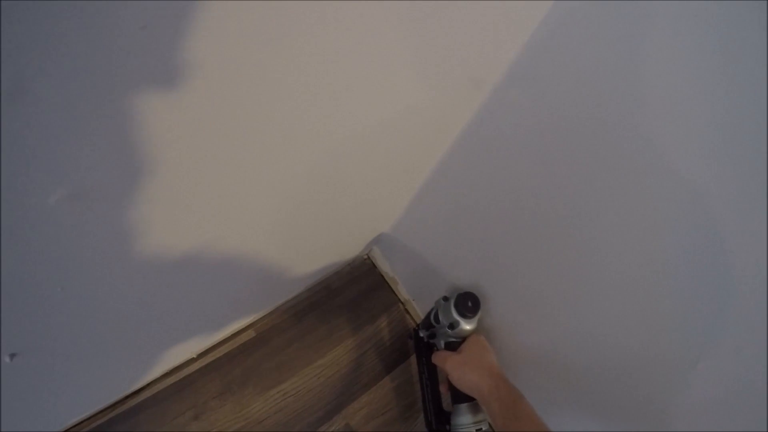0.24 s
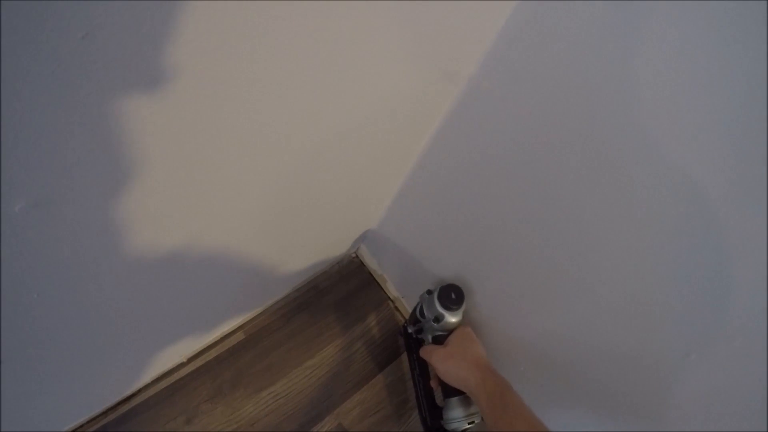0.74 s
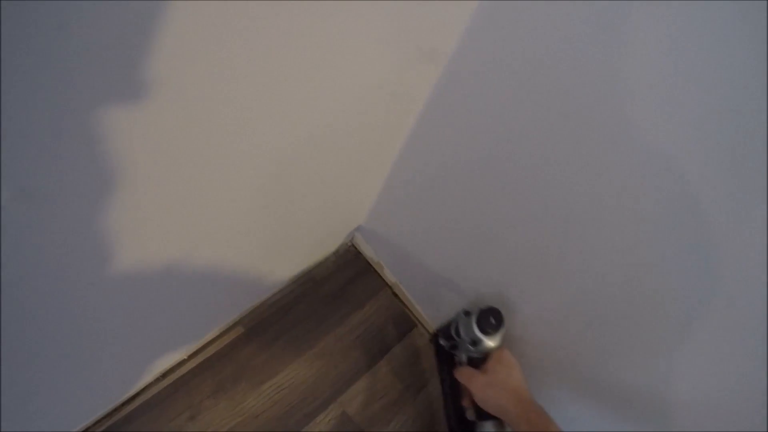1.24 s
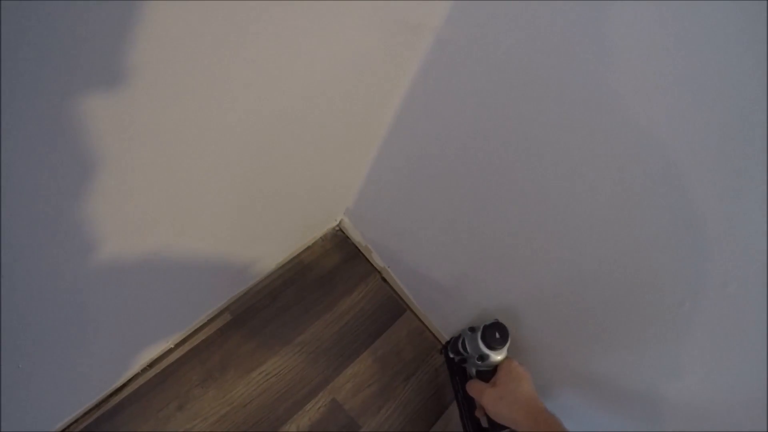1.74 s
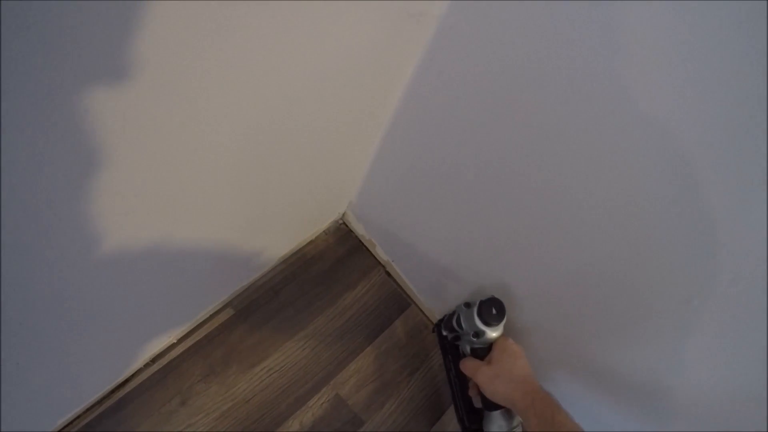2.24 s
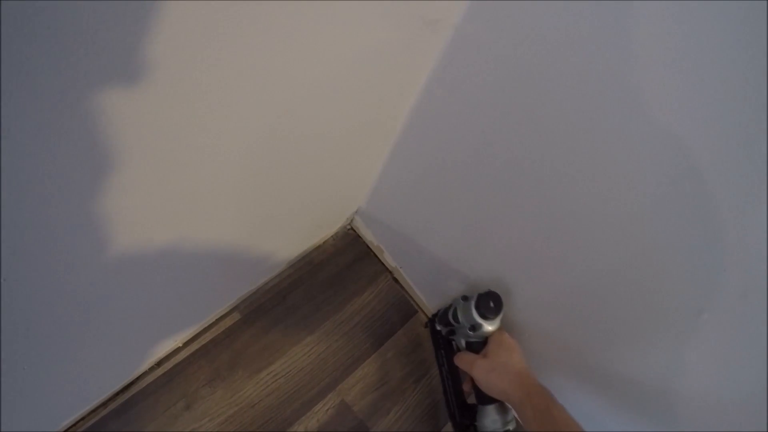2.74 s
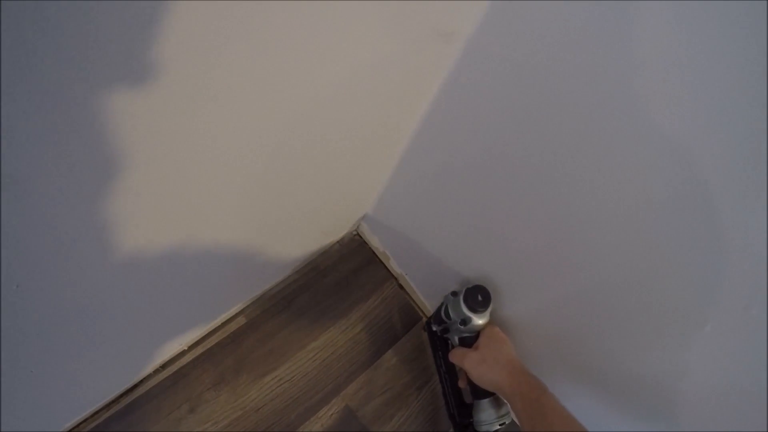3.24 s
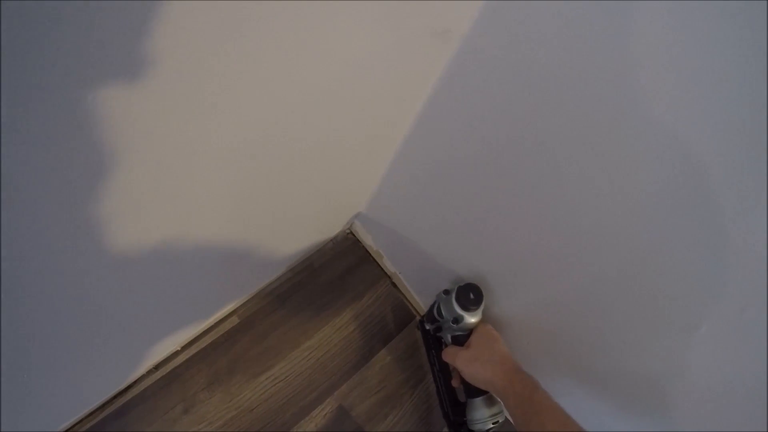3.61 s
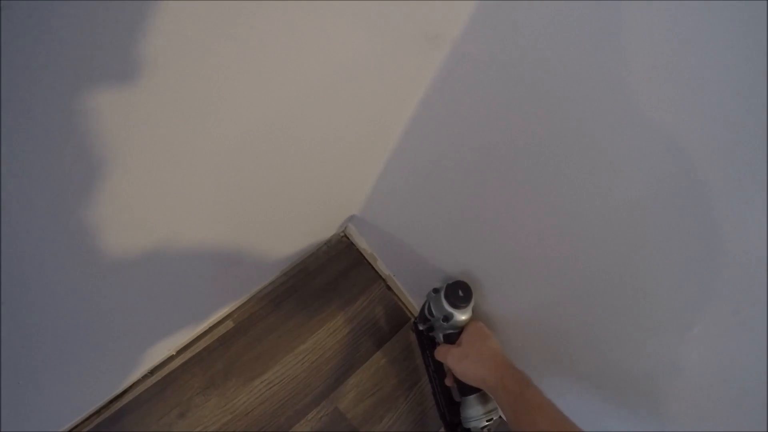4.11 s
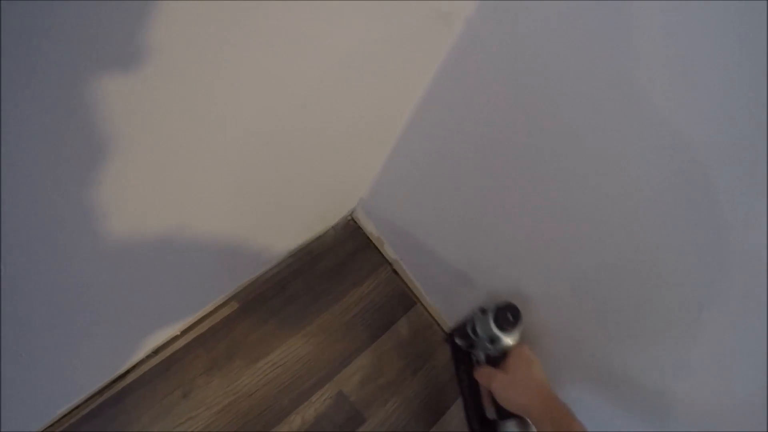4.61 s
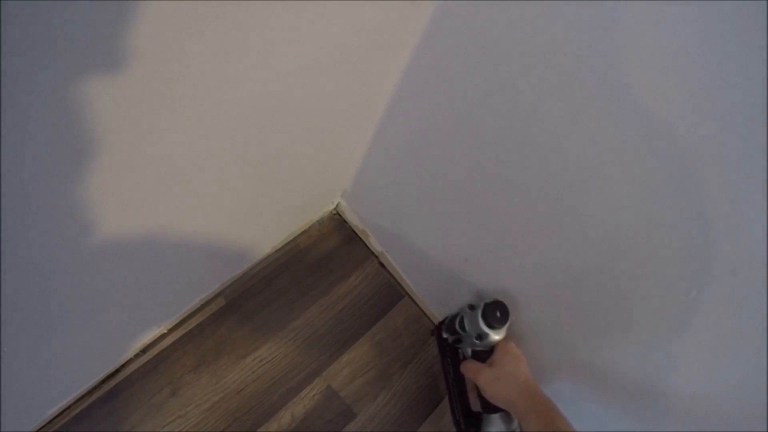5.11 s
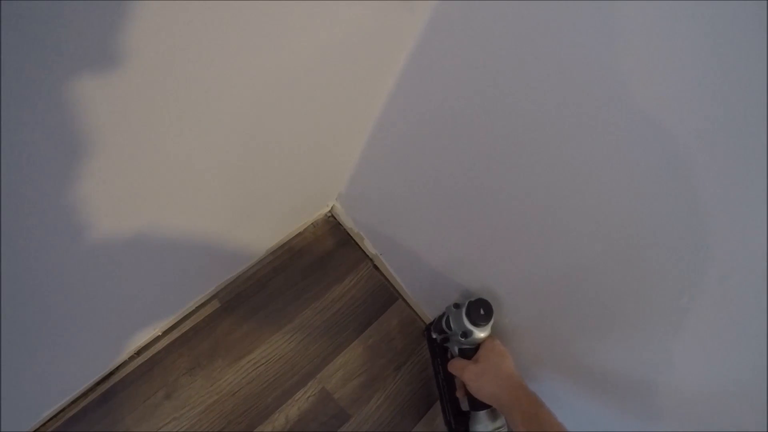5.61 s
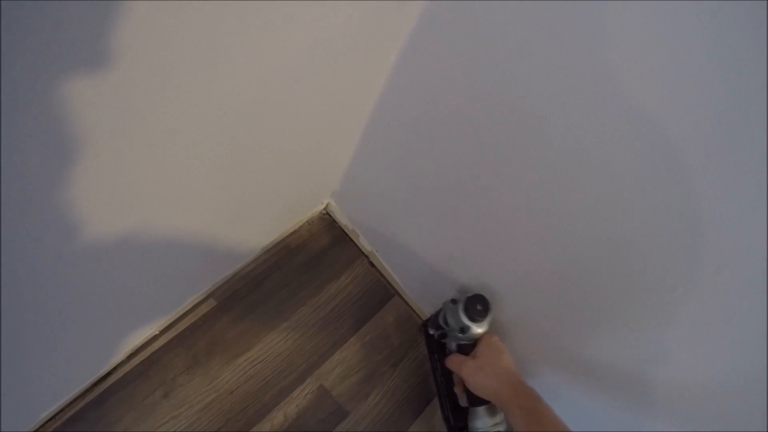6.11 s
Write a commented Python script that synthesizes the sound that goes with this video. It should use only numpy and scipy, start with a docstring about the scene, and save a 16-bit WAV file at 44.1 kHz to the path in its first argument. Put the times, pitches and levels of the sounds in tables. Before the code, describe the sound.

Two sharp, thumping nail gun shots, each followed by a puff of air, with faint tool handling on a wooden floor in between.

```python
"""Two loud nailer shots, each a thump of air and a sharp crack, on a wooden floor in a bare room.
Air slams the piston down and the driver hits the nail; on trigger release the cylinder vents
and the piston knocks back. Between shots the tool is shifted and set down: clacks, scrapes,
squeaks and soft thuds on the boards. The shots overload the close microphone."""
import sys
import numpy as np
from scipy import signal
from scipy.fft import rfft, irfft
from scipy.io import wavfile
from scipy.ndimage import minimum_filter1d

SR = 44100
rng = np.random.default_rng(int(sys.argv[2]) if len(sys.argv) > 2 else 0)


def generate_wav(sig):
    """Save sig (samples, or channels by samples) to the path in sys.argv[1] as 16-bit PCM at SR."""
    pcm = np.round(np.clip(np.atleast_2d(sig).T, -1, 1) * 32767).astype(np.int16)
    wavfile.write(sys.argv[1], SR, pcm)


N = 280035
TIME = np.arange(N) / SR

# Each row: start in seconds, air push peak in dB, crack level in dB, its rise and its T60 in seconds.
NAIL_SHOTS = [(0.7492, 16.5, 9, .001, 0.052), (5.9427, 12, 9, 0.0045, 0.038)]
# Driver and piston spectra. Each row: frequency in Hz, relative level in dB.
CRACK_COLOUR = [(50, 10.5), (130, 7), (280, -2), (430, -5.5), (900, 3), (1400, 2.5), (1850, -2),
                (3000, -8.5), (5000, -6), (6000, -11.5), (7300, -17), (15000, -27)]
PISTON_COLOUR = [(80, -7), (400, -6), (1000, 4.5), (1500, -10), (2000, -3.5), (2900, -7), (5000, -21.5),
                 (15000, -36.5)]

def shots(push_s=0.0012, strike_s=0.0059, bang_s=0.008, recoil_s=0.017):
    """The valve snaps open, air slams the piston down, the driver hits the nail, the floor rebounds."""
    valve, push, crack, bang = np.zeros((4, N))
    for start_s, push_db, crack_db, rise_s, t60_s in NAIL_SHOTS:
        strike = burst(crack_db, t60_s, rise_s)
        add(valve, start_s, burst(level_db=2, t60_s=0.086))
        add(push, start_s + push_s, pulse(push_db, low_hz=63.4, high_hz=270))
        add(push, start_s + recoil_s, pulse(peak_db=3, low_hz=80, high_hz=225))
        add(crack, start_s + strike_s, strike)
        # The crack's whole energy meets the walls as one impulse.
        add(bang, start_s + bang_s, np.linalg.norm(strike, keepdims=True))
    valve = coloured(valve, PISTON_COLOUR)
    boom = body(push, ring_gain=0.25)
    direct = body(valve + coloured(crack, CRACK_COLOUR)) + boom
    blast = from_db(-10) * coloured(bang, CRACK_COLOUR) + from_db(-11.5) * valve
    to_walls = body(blast, ring_gain=0.72) + from_db(-14) * boom
    return direct, to_walls


# Each row: start in seconds, puff peak in dB, hiss in dB, hiss T60 in seconds, piston knock in dB.
EXHAUSTS = [(0.9063, 8, -1, 0.1, -1.5), (6.0739, 7.5, -2, 0.1, -3)]
# Each row: frequency in Hz, relative level in dB.
HISS_COLOUR = [(200, 3.5), (500, 1.5), (1000, -2), (1700, -9.5), (2600, -1), (3700, -6), (5100, 3),
               (6300, -0.5), (7600, -6), (10000, -7), (13500, -2), (16000, -19.5)]

def vents(trigger_lead_s=0.0035, valve_stop_s=0.016, return_s=0.028):
    """The trigger clicks, spent air puffs and hisses out, and the piston knocks home."""
    puff, hiss, knock = np.zeros((3, N))
    for start_s, puff_db, hiss_db, hiss_t60_s, knock_db in EXHAUSTS:
        add(hiss, start_s, burst(hiss_db, hiss_t60_s, rise_s=0.0033))
        add(puff, start_s, pulse(puff_db, low_hz=44.5, high_hz=143, order=3))
        add(puff, start_s + valve_stop_s, pulse(peak_db=2, low_hz=111, high_hz=428))
        add(knock, start_s - trigger_lead_s, burst(level_db=-12, t60_s=0.066))
        add(knock, start_s + return_s, burst(knock_db, t60_s=0.024))
    exhaust = coloured(hiss, HISS_COLOUR) + body(coloured(knock, PISTON_COLOUR))
    return exhaust + puff, from_db(-13) * exhaust + from_db(-11) * puff


# Each row: start in seconds, base level in dB, clink offset in dB.
TOOL_CLACKS = [(1.254, -26.5, -16.5), (2.145, -48, -21), (2.908, -29, -17.5), (3.03, -32.5, -16),
               (3.038, -25.5, -19), (3.072, -27, -22.5), (3.225, -16.5, -15), (3.242, -34, -1.5),
               (3.27, -26, -11), (4.443, -32, -4), (4.521, -21, -9.5), (4.766, -26.5, 3), (5.057, -38, -26),
               (5.168, -28, -24), (5.178, -27.5, -13), (5.222, -27.5, -18.5), (5.345, -30.5, -7),
               (5.37, -37.5, -6.5), (5.399, -40.5, 3), (5.469, -16.5, -13), (5.691, -34.5, -22)]
# Wood and metal spectra. Each row: frequency in Hz, relative level in dB.
KNOCK_COLOUR = [(80, -10), (330, 3.5), (600, -0.5), (1150, 3), (1500, -7.5), (1850, -17), (2800, -19.5),
                (5000, -24), (15000, -58)]
CLINK_COLOUR = [(400, -10.5), (1800, -7.5), (2700, 4), (3700, -10.5), (5200, -1.5), (6800, -8),
                (8800, -16.5), (13000, -19.5), (16000, -21)]

def clacks(knock_offset_db=-4, rise_s=0.0007):
    """The tool hits floor and trim: a wooden knock and a metal clink."""
    knock, clink = np.zeros((2, N))
    for start_s, base_db, clink_offset_db in TOOL_CLACKS:
        add(knock, start_s, burst(base_db + knock_offset_db, t60_s=0.059, rise_s=rise_s))
        add(clink, start_s, burst(base_db + clink_offset_db, t60_s=0.046, rise_s=rise_s))
    return coloured(knock, KNOCK_COLOUR), coloured(clink, CLINK_COLOUR)


# Each row: start in seconds, level in dB.
TIP_TICKS = [(0.054, -46.5), (0.713, -41.5), (4.113, -42), (5.279, -36.5), (5.887, -37)]
# Each row: frequency in Hz, relative level in dB.
TICK_COLOUR = [(500, -16), (3800, -15), (4700, -1), (5300, 0), (5900, -19), (6600, -14), (7500, -27),
               (15000, -27)]

def ticks():
    """The sprung safety tip ticks."""
    track = np.zeros(N)
    for start_s, level_db in TIP_TICKS:
        add(track, start_s, burst(level_db, t60_s=0.03077))
    return coloured(track, TICK_COLOUR)


# Each row: midpoint in seconds, length in seconds, hard scrape in dB, soft shuffle in dB.
SLIDE_STROKES = [(0.009, 0.16, -61, -41), (0.393, 0.37, -73, -50.5), (3.228, 0.078, -46.5, -25),
                 (3.755, 0.14, -62, -35), (4.438, 0.13, -59.5, -41), (4.52, 0.066, -41.5, -44),
                 (5.397, 0.28, -50, -39)]
# Each row: frequency in Hz, relative level in dB.
SCRAPE_COLOUR = [(200, -9), (600, 0.5), (1080, 1), (1800, -7.5), (2800, -7.5), (3700, -16), (5300, -10.5),
                 (8500, -35), (15000, -33.5)]
SHUFFLE_COLOUR = [(40, 8.5), (110, 4), (260, 0), (500, -14.5), (1500, -41.5), (8000, -52.5)]

def scrapes(grit_db=4):
    """The sliding nose catches on the grain, so its scrape flickers."""
    envelope = sum(from_db(db) * swell(mid_s, length_s) for mid_s, length_s, db, _ in SLIDE_STROKES)
    catch_times_s = TIME[::150]
    catches = np.interp(TIME, catch_times_s, rng.standard_normal(len(catch_times_s)))
    return coloured(envelope * from_db(grit_db * catches) * rng.standard_normal(N), SCRAPE_COLOUR)


def shuffles():
    """Soft weight rubs over the boards with each slide."""
    envelope = sum(from_db(db) * swell(mid_s, length_s) for mid_s, length_s, _, db in SLIDE_STROKES)
    return coloured(envelope * rng.standard_normal(N), SHUFFLE_COLOUR)


# Each row: start in seconds, time until release in seconds, initial slip rate in Hz, level in dB.
NOSE_SQUEAKS = [(4.49, .015, 1220, -34), (4.514, 0.015, 1060, -40), (4.53, 0.02, 350, -29)]
# Each row: frequency in Hz, relative level in dB.
SLIP_COLOUR = [(300, -7), (700, -10), (1120, 6.5), (1700, -4.5), (2100, -9.5), (2850, 3.5), (3800, -16.5),
               (5000, -5), (6200, -12), (9000, -41), (15000, -45)]

def squeaks(jitter=0.31, sag_oct_per_s=5, rise_s=0.0034, t60_s=0.039):
    """The nose sticks and slips along the trim; friction brakes it, so the slips slow down."""
    track, t = np.zeros(N), TIME[:6000]
    for start_s, release_s, initial_hz, level_db in NOSE_SQUEAKS:
        rate_hz = initial_hz * 2 ** (-sag_oct_per_s * t)
        unevenness = np.maximum(1 + jitter * rng.standard_normal(len(t)), 0)
        slip_count = np.floor(np.cumsum(rate_hz * unevenness) / SR)
        slips = np.diff(slip_count, prepend=0) - rate_hz / SR  # zero-mean impulse train
        envelope = np.minimum(t / rise_s, 1) * from_db(level_db - 60 * np.maximum(t - release_s, 0) / t60_s)
        add(track, start_s, slips * np.sqrt(SR / rate_hz) * envelope)
    return coloured(track, SLIP_COLOUR)


# Nose and magazine. Each row: frequency in Hz, bandwidth in Hz, relative gain in dB.
STEEL_MODES = [(2750, 110, -12.5), (4670, 61, 6), (5060, 31, -18)]

def handling(steel_gain=0.825, wet_db=-10):
    """Light contacts ring the body gently; the clinks also ring the steel parts."""
    knock, clink = clacks()
    contact = knock + clink + ticks() + scrapes() + squeaks()
    direct = body(contact, ring_gain=0.31) + steel_gain * ringing(clink, STEEL_MODES)
    return direct, from_db(wet_db) * direct


# Each row: start in seconds, peak in dB, upper band edge in Hz (higher for a firmer landing).
LANDINGS = [(1.141, -21, 239), (2.912, -25, 410), (3.083, -19.5, 193), (3.1696, -14.5, 218),
            (3.22, -16.5, 216), (3.2871, -13, 239.8), (4.46, -23.5, 108), (4.766, -0.5, 238),
            (5.0585, -11, 188.5), (5.307, -18, 174), (5.4167, -5, 196), (5.462, -14.5, 159.4),
            (5.5089, -15.5, 190.4), (6.257, -21, 258)]
# Duller returns through the floor. Each row: delay in seconds, gain in dB, upper edge ratio.
BOARD_ECHOES = [(0.01, -8.5, 0.76), (0.036, -17.5, 0.626), (.049, -17, .65)]

def thuds(low_hz=52, sway_s=0.0079, sway_db=-20, hum_hz=305, hum_db=-25, wet_db=-14):
    """Soft weight bumps and shuffles on the boards, which sway and hum on briefly."""
    bumps, hum = np.zeros((2, N))
    for start_s, peak_db, edge_hz in LANDINGS:
        add(bumps, start_s, -pulse(peak_db, low_hz, edge_hz, order=3))
        add(bumps, start_s + sway_s, -pulse(peak_db + sway_db, low_hz=32.3, high_hz=67.5))
        add(hum, start_s, burst(peak_db + hum_db, t60_s=0.34))
        for delay_s, echo_db, ratio in BOARD_ECHOES:
            add(bumps, start_s + delay_s, -pulse(peak_db + echo_db, low_hz, edge_hz * ratio, order=3))
    hum_colour = [(hum_hz / 2, -14), (hum_hz, 0), (hum_hz * 2, -22), (4000, -65)]
    direct = bumps + coloured(hum, hum_colour) + shuffles()
    return direct, from_db(wet_db) * direct


# Nailer and boards. Each row: frequency in Hz, bandwidth in Hz, relative gain in dB.
BODY_MODES = [(96, 12, 2), (184, 17, 8), (294, 38, 12.5), (683.6, 100, -8), (787, 18, -11.5), (896, 35, -5),
              (993, 24, -4), (1150, 35, 1.5), (1246, 18, 4.5), (1378, 79, -1), (1585, 17, 1),
              (1970, 13, -2.5), (2304, 17, 2.5), (2744, 22, 3.5), (2860, 14, 0), (2840, 17, 4),
              (3420, 12, 1), (3810, 53, -3.5), (4480, 49, 0.5), (4500, 790, -5), (5500, 70, -4.5)]

def body(blow, ring_gain=0.97):
    """A blow plus the ringing it excites in the tool and the boards."""
    return blow + ring_gain * ringing(blow, BODY_MODES)


# Each row: frequency in Hz, T60 in seconds.
REVERB_T60_S = [(60, 0.45), (300, 0.69), (1000, 0.78), (3000, 0.75), (5200, 0.6762), (8000, 0.4),
                (14000, 0.48)]
# Each row: frequency in Hz, relative level in dB.
REVERB_COLOUR = [(50, -1.5), (110, 1.5), (250, -3.5), (450, 1.1), (1200, -4), (4000, 3.5), (8000, 1.5),
                 (14000, 4.5)]

def room(x, first_echo_s=0.0016, build_s=0.008, bands=16):
    """Dense echoes off bare walls; the midrange lasts longest."""
    t, tail = TIME[:SR], np.zeros(SR)
    white, hz = rfft(rng.standard_normal(SR)), np.fft.rfftfreq(SR, 1 / SR)
    centres_hz = np.geomspace(60, 15000, bands)
    for centre_hz, weights in zip(centres_hz, np.eye(bands)):
        band = irfft(white * at_hz(np.c_[centres_hz, weights], hz), SR)
        decay_db = 60 * t / at_hz(REVERB_T60_S, centre_hz)
        tail += band * from_db(at_hz(REVERB_COLOUR, centre_hz) - decay_db)
    tail *= np.clip((t - first_echo_s) / build_s, 0, 1)
    return signal.fftconvolve(x, tail / np.linalg.norm(tail))[:N]


# Each row: time in seconds, level in dB.
RUMBLE_LEVELS = [(0, -51.5), (1.3, -47), (1.6, -55.5), (2.5, -49.5), (4.05, -52), (4.7, -39.5),
                 (6.35, -38.5)]
# Each row: frequency in Hz, relative level in dB.
MOVEMENT_COLOUR = [(15, -7), (35, 1), (60, -4), (110, -12.5), (250, -22), (700, -38), (3000, -69)]
AIR_COLOUR = [(12, -31.5), (20, -5), (44, 1.5), (116, -13.5), (180, -25.5), (245, -27), (289, -35),
              (534, -25), (614, -30), (686, -35.5), (1270, -35.5), (1450, -38), (2090, -40.5), (5850, -43),
              (15500, -56)]

def background(air_db=-47):
    """Rumble of movement at the microphone, over still room air and microphone hiss."""
    rumble_db = np.interp(TIME, *np.transpose(RUMBLE_LEVELS))
    rumble = from_db(rumble_db) * coloured(rng.standard_normal(N), MOVEMENT_COLOUR)
    return rumble + from_db(air_db) * coloured(rng.standard_normal(N), AIR_COLOUR)


def from_db(db):
    """Decibels to gain."""
    return 10 ** (np.asarray(db) / 20)


def at_hz(table, hz):
    """Read a table on a log-frequency axis."""
    table_hz, values = np.transpose(table)
    return np.interp(np.log(np.maximum(hz, 1)), np.log(table_hz), values)


def add(track, start_s, sound):
    """Mix a sound into a track."""
    i = int(round(start_s * SR))
    track[i:i + len(sound)] += sound[:N - i]


def coloured(x, colour, size=4096):
    """Minimum-phase filter that keeps the power of white noise."""
    gain = from_db(at_hz(colour, np.fft.rfftfreq(size, 1 / SR)))
    cepstrum = irfft(np.log(gain))
    cepstrum[1:size // 2] *= 2
    cepstrum[size // 2 + 1:] = 0
    response = irfft(np.exp(rfft(cepstrum)))
    return signal.fftconvolve(x, response / np.linalg.norm(response))[:N]


def burst(level_db, t60_s, rise_s=0.001):
    """A rush of tiny contacts or eddies that builds quickly and dies away."""
    t = TIME[:12000]
    envelope = np.minimum(t / rise_s, 1) * from_db(level_db - 60 * np.maximum(t - rise_s, 0) / t60_s)
    return rng.standard_normal(len(t)) * envelope


def pulse(peak_db, low_hz, high_hz, order=2):
    """One pressure pulse that swings back and settles."""
    bandpass = signal.butter(order, [low_hz, high_hz], "band", fs=SR, output="sos")
    wave = signal.sosfilt(bandpass, signal.unit_impulse(6000))
    return from_db(peak_db) * wave / np.abs(wave).max()


def swell(mid_s, length_s):
    """Bell-shaped envelope of one movement."""
    return np.exp(-np.pi * ((TIME - mid_s) / length_s) ** 2)


def ringing(x, modes):
    """Response of a bank of damped resonances."""
    total = np.zeros(N)
    for hz, width_hz, gain_db in modes:
        radius = np.exp(-np.pi * width_hz / SR)
        feedback = [1, -2 * radius * np.cos(2 * np.pi * hz / SR), radius ** 2]
        gain = from_db(gain_db) * (1 - radius ** 2) / 2
        total += gain * signal.lfilter([1, 0, -1], feedback, x + 1e-18)
    return total


def scene():
    """Tool and floor sounds arrive directly and off the walls, over the background."""
    direct, to_walls = np.sum([shots(), vents(), handling(), thuds()], axis=0)
    return (direct + room(to_walls) + background())[None]


def gain_control(x, threshold_db=1, max_cut_db=10, hold_s=0.65, release_db_per_s=13, attack_s=0.004):
    """An overload turns the gain down; it holds, then creeps back."""
    level_db = 20 * np.log10(np.abs(x) + 1e-9)
    demand_db = np.clip(4 * (level_db - threshold_db), 0, max_cut_db)
    half_hold = int(hold_s * SR / 2)
    held_db = -minimum_filter1d(-demand_db, 2 * half_hold + 1, origin=half_hold, mode="constant")
    ramp_db = release_db_per_s * TIME
    cut_db = np.maximum.accumulate(held_db + ramp_db) - ramp_db
    pole = np.exp(-1 / (attack_s * SR))
    return x * from_db(-signal.lfilter([1 - pole], [1, -pole], cut_db))


def record(dry, cutoff_hz=15500):
    """Gain control, overload that flattens the peaks, and a steep top cut."""
    x = gain_control(dry[0])
    clipped = 0.95 * x / (1 + x ** 6) ** (1 / 6)
    lowpass = signal.ellip(10, 0.2, 80, cutoff_hz, fs=SR, output="sos")
    return signal.sosfilt(lowpass, clipped)[None]


dry = scene()
out = record(dry)
generate_wav(out)
```